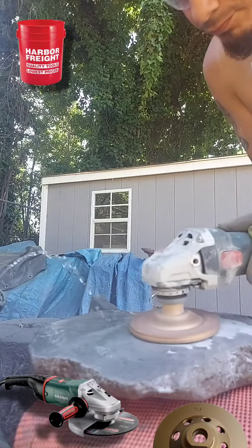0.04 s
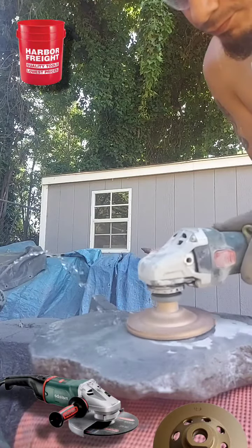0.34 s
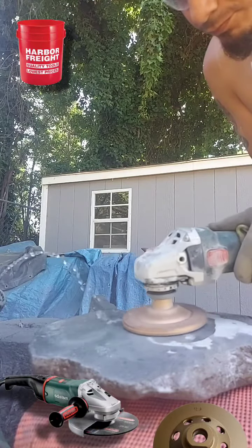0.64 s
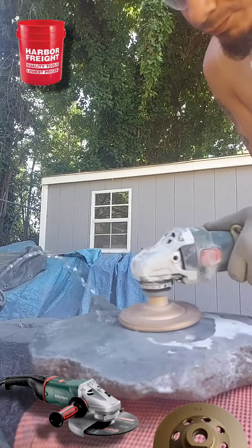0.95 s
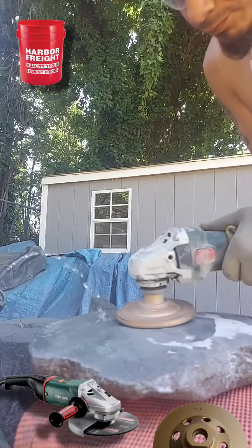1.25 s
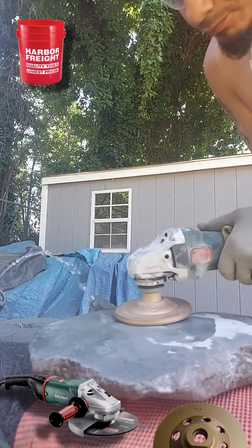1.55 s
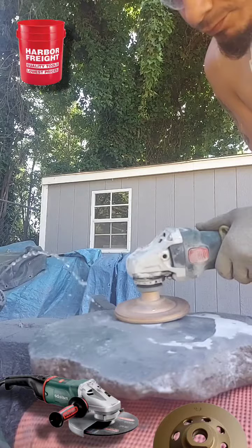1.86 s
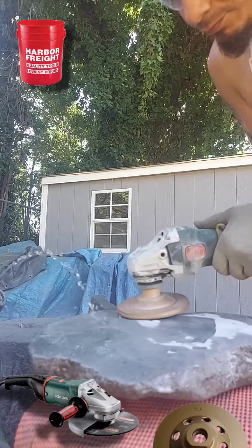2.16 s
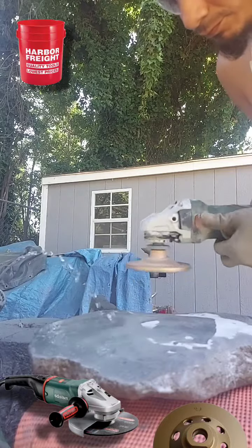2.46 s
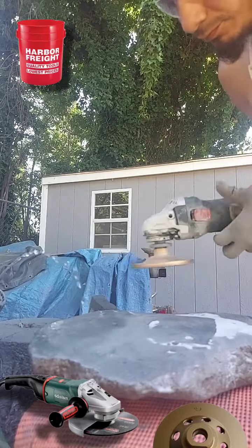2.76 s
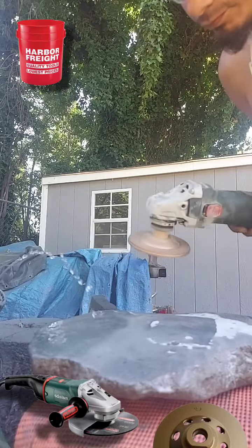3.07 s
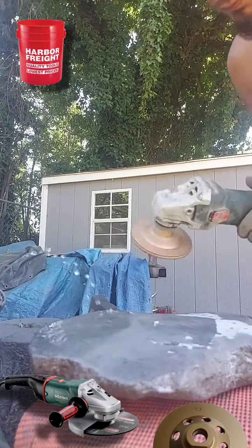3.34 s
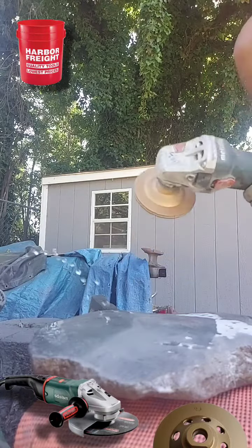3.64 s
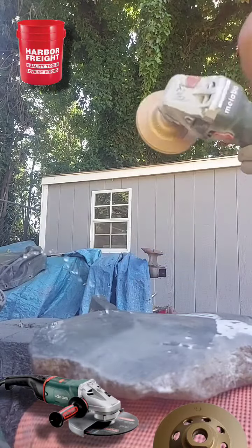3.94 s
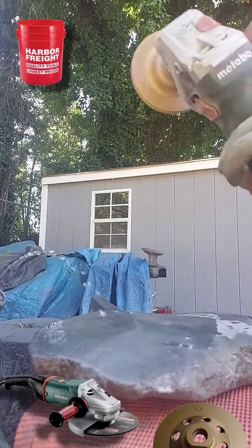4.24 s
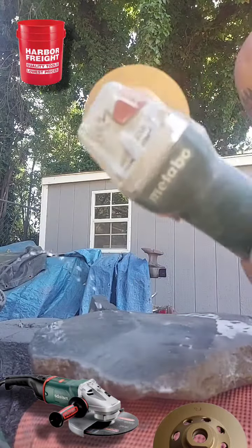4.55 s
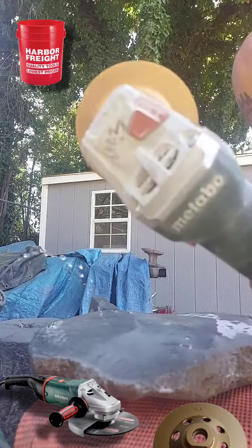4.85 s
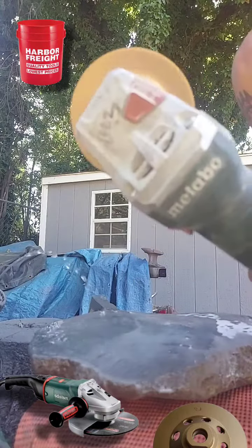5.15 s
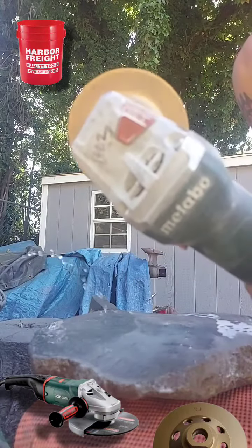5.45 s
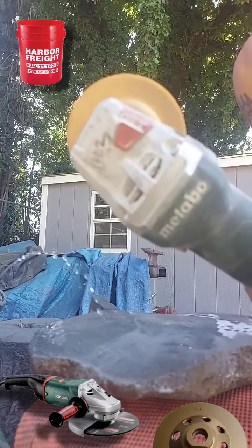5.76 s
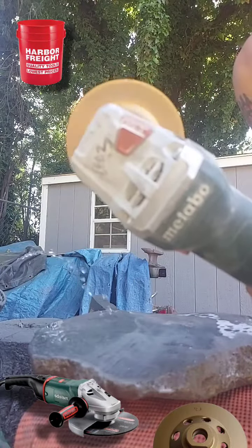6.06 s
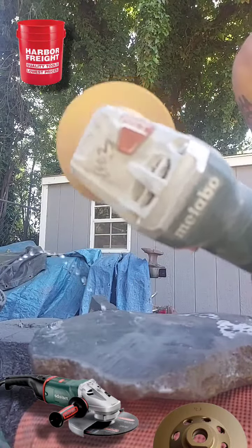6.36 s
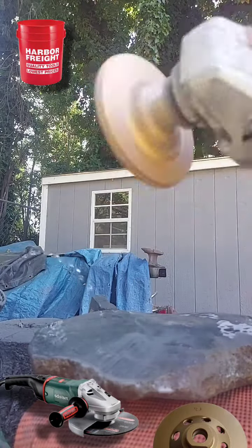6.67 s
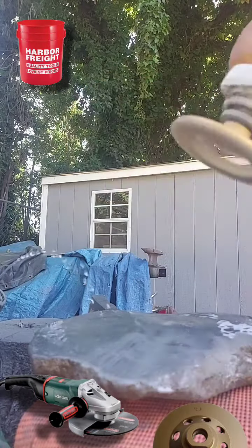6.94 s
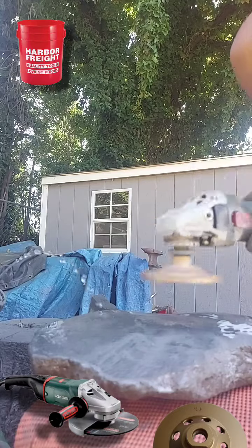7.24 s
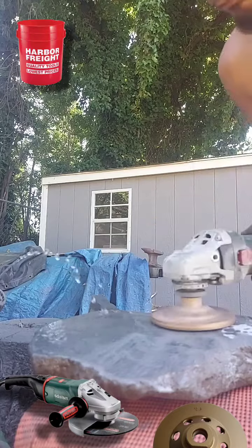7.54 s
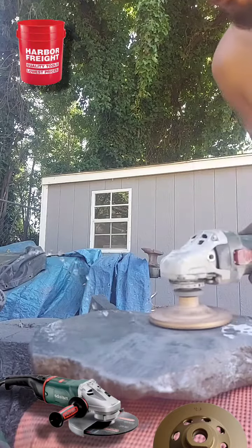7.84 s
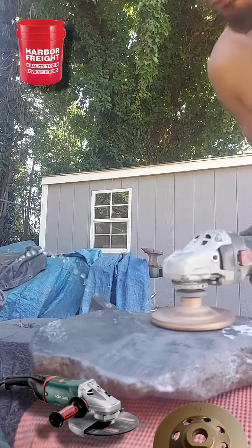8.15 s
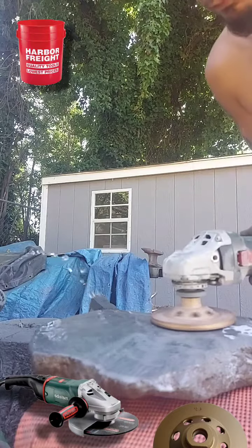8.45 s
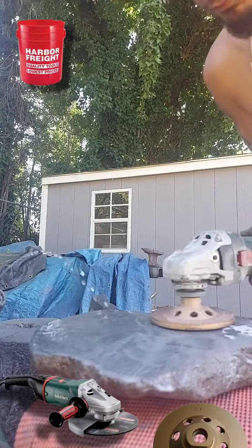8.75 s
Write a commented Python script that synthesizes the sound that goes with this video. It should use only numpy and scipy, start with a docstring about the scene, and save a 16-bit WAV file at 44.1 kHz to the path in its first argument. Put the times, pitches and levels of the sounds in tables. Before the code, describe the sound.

A loud, muffled rasp and steady gear whine come from an angle grinder working wet stone near the microphone, over faint outdoor rumble. The wheel leaves the slab and the motor winds down in a bright airy hiss, with low puffs of air hitting the microphone. A squeaky bearing rattle comes closer, harder and lower in pitch. Finally the steel wheel bumps back onto the stone, scraping and ringing through water spray as it slows.

```python
"""A loud, dull rasp, close by: an angle grinder bites into a wet stone slab outdoors, gears singing.
It lifts off, the treble opens up and it coasts down: the fan hisses, the wheel's draught buffets
the microphone and a loose bearing chatters ever lower. Set back on the stone, the steel wheel
scrapes, throws spray, rings in pairs of tones that close up as it slows, and nearly stops."""
import sys
import numpy as np
from scipy import signal
from scipy.fft import rfft, irfft, next_fast_len
from scipy.io import wavfile
from scipy.ndimage import map_coordinates

SR = 44100
rng = np.random.default_rng(int(sys.argv[2]) if len(sys.argv) > 2 else 0)


def unload_audio(sound):
    """Save the sound as a 16-bit wav file, at the path given as the first command line argument."""
    columns = np.transpose(np.atleast_2d(sound))
    # keep every value between -1 and 1, then stretch to whole-number steps
    steps = np.round(np.clip(columns, -1, 1) * 32767)
    wavfile.write(sys.argv[1], SR, steps.astype(np.int16))


N = 392490
T = np.arange(N) / SR
LIFT_S, POWER_OFF_S, TOUCH_S = 2.296, 2.45, 7.541
FULL_SPEED_HZ, TOP_HZ = 549, 14560  # motor under power; upper edge of the sound

# Levels in the tables are relative, ahead of the mix gains.
# The tool's panning. Each row: time in seconds, left lag in samples, left level in dB.
PAN = [(0, -2, -7.5), (2.3, 2, -5), (3.8, -2.5, -4.5), (4.3, -7, -3.5), (6.2, -6, -1.5), (7.2, -6, -5.5),
       (7.6, 2, -5.5), (8.9, 7, -5.5)]
# Pressure on the stone. Each row: time in seconds, level of the lead gear tone in dB.
LOAD = [(0.0, -25), (0.25, -24), (0.41, -38), (1.1, -20), (1.31, -23.5), (1.38, -31), (1.5, -15.5),
        (1.57, -25), (1.85, -17), (1.93, -30.5), (1.99, -22), (2.28, -39)]
# Tone of grit on stone. Each row: frequency in Hz, level in dB.
RASP_EQ = [(88, -45.5), (150, -4.5), (298, -5.5), (353, -1), (468, -7.5), (621, -5), (693, -6), (755, 0),
           (833, -7), (1190, -5.5), (1280, -10.5), (1780, -3.5), (2800, -16.5), (3640, -34), (6160, -120)]
# Fader of the upper rasp. Each row: time in seconds, level in dB.
GRIT_FADER = [(0.0, -23.5), (1.0, -23.5), (1.38, -26.5), (1.57, -21.5), (2.26, -24), (2.28, -19.5)]
# The grit bites; the rim squeals. Each row: centre in seconds, half length in seconds, level in dB.
GRIT_SURGES = [(.15, 0.055, -3.5), (.62, 0.019, 1), (.8, 0.067, -2), (1.77, 0.056, -10)]
RIM_SQUEAL = [(.56, 0.14, -32.5)]
# The body's two low resonances. Each row: time in seconds, growl in dB, drone in dB.
BODY_FADERS = [(0, -39, -34), (.5, -37.5, -26), (.72, -32.5, -29.5), (1.05, -26, -31), (1.36, -35, -32),
               (1.48, -22.5, -34.5), (1.58, -38, -36), (1.86, -26.5, -30), (2.28, -29.5, -36.5)]
# Gears under load. Each row: pitch in Hz, level in dB, drift in dB per second, left level in dB.
GEAR_TONES = [(665, -40.5, -3, -4.5), (751, -25, 0, -7), (1135, -40, 4, -11), (1270, -41, -3, 0.5),
              (1325, -39, 1.5, -3.5), (1713, -33.5, -4.5, -14.5), (1723, -32, -1, -18.5),
              (1875, -31.5, -2.5, -11.5), (1943, -39, -5, -11), (2060, -39.5, -3, -15.5),
              (2373, -36, -1.5, -4), (2566, -41, -4, 2.5), (2740, -45, -2, 6.5)]
# Outdoor rumble; low buffeting under load. Each row: frequency in Hz, level in dB.
YARD_EQ = [(25, -46), (85, -2), (125, 6.5), (190, -11.5), (600, -18), (2500, -55)]
BUFFET_EQ = [(3, -44.5), (9, -1.5), (18, 3), (45, -4), (90, -10.5), (200, -17), (450, -26.5),
             (1000, -41.5)]
# The tool's path. Each row: time in seconds, distance in metres.
TOOL_DISTANCE = [(3.2, 0.49), (3.7, 0.44), (4.1, 0.31), (4.6, 0.2), (4.95, 0.13), (5.35, 0.12),
                 (6.55, 0.14), (6.9, 0.17), (7.25, 0.25), (8.9, 0.36)]
# Fan layers by name. Each row: level in dB at full speed on the slab, speed and nearness exponents.
FAN_LAYERS = {"rush": (-34, 1, 0.96), "hiss": (-33.5, 0.89, 1.2), "whistle": (-26, 1.65, 0.25),
              "fizz": (-22, 1.24, 0.27), "slots": (-48.5, 3, 1.1)}
# Four bands of fan air, then the whine's colour. Each row: frequency in Hz, level in dB.
RUSH_EQ = [(180, -31), (270, -3), (360, -13.5), (480, -1), (750, -1.5), (1100, 3.5), (1600, 2), (2400, 5),
           (3500, -2.5), (6000, -25.5)]
HISS_EQ = [(1500, -37), (2400, -3), (3000, 7), (3700, -0.5), (4800, 4.5), (6200, -6.5), (7500, -16),
           (9500, -39)]
WHISTLE_EQ = [(100, -18), (450, -12.5), (4500, -3), (6200, 1.5), (7200, 0), (8200, 4.5), (8800, 0.5),
              (9500, -16), (11000, -44)]
FIZZ_EQ = [(8500, -43), (9800, -6.5), (10800, -0.5), (12500, 4.5), (14000, 9.5), (14600, 5)]
WHINE_EQ = [(6500, -2), (8300, 15), (9600, -15), (11200, 19), (14000, 8)]
# The whine's partials, in multiples of the motor speed.
WHINE_HARMONICS = [25, 49, 54]
# Fader of the rotor's hum. Each row: time in seconds, level in dB.
HUM_FADER = [(3.5, -51), (4.35, -46), (5.2, -49), (6.1, -51.5), (7.1, -58)]
# The bearing's running chatter. Each row: time in seconds, pitch in Hz, level in dB.
CHATTER_GLIDE = [(2.3, 5000, -27.5), (3.0, 4985, -32), (3.4, 5070, -26.5), (3.75, 4300, -29),
                 (3.87, 4406, -34), (4.15, 4520, -28.5), (4.42, 4236, -31), (4.56, 4108, -36),
                 (4.9, 3900, -27), (5.3, 3500, -24.5), (5.65, 3266, -27), (6.1, 3142, -24),
                 (6.6, 2900, -26), (7.1, 2850, -36.5), (7.5, 2434, -32)]
# Resonances of the bearing cage and the gear head. Each row: pitch in Hz, width in Hz, level in dB.
CAGE_MODES = [(3080, 540, -31), (3780, 420, -29), (4270, 91, -32), (4760, 460, -38)]
HEAD_MODES = [(1840, 160, -17), (4230, 50, -20), (10400, 80, -22)]
# The bearing's hard catches. Each row: start in seconds, level in dB, pitch in Hz.
CATCH_CUES = [(4.5607, -7, 4200), (4.5815, -7.2, 4200), (4.606, -11, 4280), (4.6204, -12.8, 4190),
              (4.649, -12.1, 4080), (4.6619, -11.6, 3980), (4.7172, -12.5, 3840), (5.2116, -10.5, 3490),
              (5.253, -9.5, 3520), (5.5738, -11.5, 3360), (5.6641, -12.5, 3410), (6.1744, -11.5, 3090),
              (6.4341, -12.4, 2950), (6.4639, -14.7, 2680), (6.4915, -14.7, 2710), (6.5168, -12.0, 2680),
              (6.5446, -12.5, 2680), (6.5677, -13.7, 2490), (6.5883, -13.0, 2760), (6.6163, -11.3, 2720),
              (6.6371, -12.6, 2950), (6.6568, -11.1, 2830), (6.6838, -10.1, 2780), (6.7103, -12.6, 2980),
              (6.7309, -12.6, 2440), (6.7589, -12.3, 2890), (6.7862, -9.3, 2530), (6.7966, -14.9, 2580),
              (6.8046, -15.5, 2560), (6.8205, -14.9, 2570), (6.8472, -14.6, 2650), (6.8622, -12.3, 2730),
              (6.8874, -11.2, 2600), (6.9088, -13.6, 2620), (6.9155, -12.8, 2610), (6.9201, -13.2, 2410),
              (6.9469, -11.2, 2600), (6.976, -13.6, 2510), (6.9931, -14.2, 2590), (7.0184, -19.0, 2560),
              (7.0398, -18.7, 2540), (7.0575, -15.4, 2490), (7.0833, -13.8, 2540), (7.1044, -13.0, 2510),
              (7.1152, -15.1, 2510), (7.123, -13.0, 2530), (7.1519, -14.7, 2460), (7.1809, -14.6, 2540),
              (7.2122, -16.8, 2520), (7.2267, -16.8, 2460), (7.2527, -16.5, 3120), (7.2754, -16.6, 2530),
              (7.3079, -14.5, 2510), (7.3293, -18.5, 2500), (7.3544, -16.1, 2500), (7.3763, -14.2, 2520),
              (7.3952, -17.1, 2490), (7.4124, -19.2, 2490), (7.427, -16.5, 3250), (7.454, -13.8, 2410),
              (7.473, -15.4, 2350), (7.494, -16.1, 2480), (7.514, -15.9, 2460), (7.526, -14.5, 2400)]
# Colour of the housing and of a catch's hard edge. Each row: frequency in Hz, level in dB.
HOUSING_EQ = [(100, -51), (450, -1.5), (1500, -10.5), (2500, -3), (3650, -3), (5300, 0.5), (7900, -9),
              (9600, -32), (11000, -2.5), (13500, 3.5), (14500, -12)]
TICK_EQ = [(100, -54), (1500, -21), (4000, -16.5), (6200, 10.5), (9600, -42), (11200, -6), (13500, 3.5)]
# The wheel rings off the stone. Each row: pitch in Hz, level in dB, seconds to fall by 60 dB.
LIFT_RING = [(2274, -34, 0.23), (2750, -24.5, 0.5), (6000, -24, 0.3)]
# The wheel bumps the stone. Each row: start in seconds, level in dB.
BUMP_CUES = [(2.38, -20), (7.541, -13), (7.964, -17.5)]
# Tone of the graze and bumps. Each row: frequency in Hz, level in dB.
CONTACT_EQ = [(100, -6), (1200, -3.5), (5000, -7), (14000, -16)]
# The wheel's bending modes. Each row: pitch at rest in Hz, nodal diameters, width in Hz,
# forward wave in dB, backward wave in dB, change in dB by the end of braking.
WHEEL_MODES = [(5716, 3, 45, -1, -6, 0), (9740, 4, 23, -8, -13.5, -3), (14530, 5, 25, -6.5, -2, -4.5)]
# Fader of the rubbed steel's ring. Each row: time in seconds, level in dB.
RUB_FADER = [(7.57, -22.5), (7.68, -18), (7.95, -23), (8.07, -20), (8.6, -20.5), (8.9, -28)]
# Passes of the draught. Each row: centre in seconds, half length in seconds, typical eddy in dB.
DRAUGHT_SWEEPS = [(2.34, 0.086, -22.5), (2.7, 0.33, -30), (3.72, 0.17, -26.5), (6.85, 0.11, -41),
                  (8.0, 0.5, -36.5)]
# Its strongest puffs. Each row: time in seconds, peak in dB.
PUFF_CUES = [(2.333, -15), (2.412, -18.5), (2.566, -19.5), (2.586, -17), (2.659, -18.5), (2.741, -19),
             (2.763, -17.5), (2.872, -19.5), (3.018, -19), (3.073, -19), (3.259, -25.5), (3.339, -22.5),
             (3.52, -20), (3.61, -22), (3.677, -16.5), (3.746, -18), (7.565, -18), (7.579, -18),
             (7.853, -14), (7.885, -18.5), (7.971, -14.5), (8.063, -25.5), (8.223, -19), (8.237, -19),
             (8.311, -22)]
# The rim's groan. Each row: time in seconds, pitch in Hz, level in dB.
GROAN_GLIDE = [(7.55, 2460, -34), (7.7, 2550, -34), (8.05, 2620, -36), (8.42, 2782, -31),
               (8.9, 2734, -30.5)]
# Sliding on stone, and the water thrown. Each row: frequency in Hz, level in dB.
SCRAPE_EQ = [(100, -37.5), (300, -5), (700, -3.5), (1100, 4.5), (1550, -2.5), (2700, 2), (3600, -2.5),
             (4800, 3.5), (7000, 5), (10000, -32)]
SPRAY_EQ = [(400, -54), (4500, -13), (6300, 0), (8300, 0), (9300, -0.5), (11300, -7), (12600, -1.5),
            (14000, 3.5), (14600, 1.5)]
# Colour of the shaded left side and of the dull opening. Each row: frequency in Hz, gain in dB.
LEFT_EQ = [(30, -6.5), (500, 3.5), (1100, 0), (4500, -2), (8000, -3.5), (9700, 3), (11000, 0.5),
           (14000, -6.5)]
MUFFLE_EQ = [(2720, 1.5), (2800, -4), (2950, -8), (3080, -28.5), (3500, -100)]


def amp(db):
    """Decibels to gain."""
    return 10 ** (np.asarray(db) / 20)


def unit(x):
    """Scale to rms 1."""
    return x / np.sqrt(np.mean(x ** 2) + 1e-20)


def curves(rows):
    """One automation curve for each column after the time."""
    s, *columns = np.transpose(rows)
    return [np.interp(T, s, column) for column in columns]


def wobble(rate):
    """A smooth random curve, rate knots a second."""
    knots = rng.standard_normal(int(N * rate / SR) + 4)
    return np.interp(T, T[::10], map_coordinates(knots, [T[::10] * rate]))


def filtered(x, response):
    """Filter x by a gain given as a function of frequency."""
    size = next_fast_len(N + 8192)
    return irfft(rfft(x, size) * response(np.fft.rfftfreq(size, 1 / SR)), size)[..., :N]


def equalised(x, eq):
    """x through an EQ of (Hz, dB) points on a log axis."""
    points_hz, db = np.transpose(eq)
    return filtered(x, lambda hz: amp(np.interp(np.log(hz + 1), np.log(points_hz), db)))


def noise(eq):
    """Noise of rms 1 shaped by an EQ."""
    return unit(equalised(rng.standard_normal(N), eq))


def phase_of(hz):
    """Running phase of a gliding pitch."""
    return 2 * np.pi * np.cumsum(hz + np.zeros(N)) / SR


def rubbed(hz, width):
    """A resonance of rms 1 kept ringing by random friction; its centre may move."""
    kicks = rng.standard_normal((2, N))
    pole, skirt = np.exp(-np.pi * width / SR), np.exp(-np.pi * width * 8 / SR)
    swell = signal.lfilter([1], np.poly([pole, skirt]), kicks)
    phase = phase_of(hz)
    return unit(swell[0] * np.cos(phase) + swell[1] * np.sin(phase))


def fade_in(start_s, rise_s):
    """A straight ramp from 0 to 1."""
    return np.clip((T - start_s) / rise_s, 0, 1)


def swells(rows):
    """Bell-shaped gains. Each row: centre in seconds, half length in seconds, level in dB."""
    return sum(amp(db) * np.exp(-((T - s) / half) ** 2) for s, half, db in rows)


def bursts(times, sizes, rise_s):
    """Envelope of short hits, each peaking at its size one rise time after it starts."""
    age = np.arange(SR // 30) / SR / rise_s
    starts = np.bincount(np.clip(times * SR, 0, N - 1).astype(int), sizes, N)
    return signal.fftconvolve(starts, age * np.exp(1 - age))[:N]


def panned(x, left_db, scatter, turn=0, swirl=np.pi):
    """The right side faces the tool; the left is shaded, shifted and scattered in phase."""
    lag, shade_db = curves(PAN)
    analytic = signal.hilbert(x, next_fast_len(N))[:N]
    diffuse = np.real(analytic * np.exp(1j * (turn + swirl * wobble(100))))
    direct = map_coordinates(x, [np.arange(N) - lag], order=2)
    left = np.sqrt(1 - scatter) * direct + np.sqrt(scatter) * diffuse
    return np.array([amp(shade_db + left_db) * left, x])


def grinding(growl_hz=346, drone_hz=619, squeal_hz=2752):
    """Grit rasps on stone over a growling body, gear tones, a brief squeal and low buffeting."""
    load_db, = curves(LOAD)
    grit_db, = curves(GRIT_FADER)
    lean_db = load_db - load_db.mean()
    scrape = noise(RASP_EQ) * amp(1.3 * wobble(190))
    low = unit(filtered(scrape, lambda hz: 1 / (1 + (hz / 1130) ** 40)))
    high = unit(filtered(scrape, lambda hz: 1 - 1 / (1 + (hz / 1370) ** 16)))
    rasp = amp(-25 + 0.047 * lean_db) * low + amp(grit_db - 2.5) * high
    rasp += amp(grit_db - 6.5) * swells(GRIT_SURGES) * high
    mesh = phase_of(1 + 0.00242 * wobble(6.1))  # growl and gear tones waver slightly in pitch together
    growl_db, drone_db = curves(BODY_FADERS)
    growl = amp(growl_db) * np.sin(growl_hz * mesh + .6 * wobble(35))
    drone = amp(drone_db) * rubbed(drone_hz, 32)
    squeal = swells(RIM_SQUEAL) * rubbed(squeal_hz, 12)
    buffet = amp(-26 + 0.32 * lean_db + 2.9 * wobble(7.91) + 3.6 * wobble(60)) * noise(BUFFET_EQ)
    pair = panned(rasp, left_db=-6.5, scatter=1)
    pair += panned(growl + drone + squeal, left_db=-7, scatter=0.24)
    pair += gears(mesh, load_db) + buffet * amp([[-26], [0]])
    return pair * (1 - fade_in(LIFT_S, 0.0045))


def gears(mesh, load_db, left_lead_s=.00014):
    """Meshing gears sing: the lead tone swells with the pressure, the weaker ones come and go."""
    strongest = max(row[1] for row in GEAR_TONES)
    pair = 0
    for hz, db, drift, left_db in GEAR_TONES:
        if db == strongest:
            level = load_db - .9 + 1.9 * wobble(27)
        else:
            level = db + drift * (T.clip(0, LIFT_S) - LIFT_S / 2) + 2.6 * wobble(4.52)
        phase = hz * mesh + 0.31 * wobble(45)
        left = amp(left_db) * np.sin(phase + 2 * np.pi * hz * left_lead_s)
        pair += amp(level) * np.array([left, np.sin(phase)])
    return pair


def yard():
    """A faint, uneven bed of outdoor rumble."""
    return amp(-49.5 + 3 * wobble(12)) * np.array([noise(YARD_EQ), noise(YARD_EQ)])


def motor_speed(drag_s=7.5, friction_hz_per_s=20, brake_hz_per_s=128):
    """Turns per second: steady under power, slowed by air drag and bearings, then by the stone."""
    coasting_s = np.clip(T - POWER_OFF_S, 0, TOUCH_S - POWER_OFF_S)
    friction_hz = friction_hz_per_s * drag_s
    free_hz = (FULL_SPEED_HZ + friction_hz) * np.exp(-coasting_s / drag_s) - friction_hz
    return free_hz - brake_hz_per_s * np.maximum(T - TOUCH_S, 0)


def fan_gain(layer, slab_m=.45):
    """Gain of one fan layer: louder when faster and when nearer."""
    db, speed_power, near_power = FAN_LAYERS[layer]
    metres, = curves(TOOL_DISTANCE)
    return amp(db) * (motor_speed() / FULL_SPEED_HZ) ** speed_power * (slab_m / metres) ** near_power


def fan():
    """Air rushes through the vents, with the falling hum and thin whine of the rotor."""
    jet = amp(7 * swells([(3.78, 0.26, 0)]))  # the vents swing past and whistle louder
    air = fan_gain("rush") * noise(RUSH_EQ) + fan_gain("hiss") * noise(HISS_EQ)
    air += jet * fan_gain("whistle") * noise(WHISTLE_EQ)
    air += jet ** 0.44 * fan_gain("fizz") * noise(FIZZ_EQ)
    hum_db, = curves(HUM_FADER)
    speed = motor_speed()
    whine = fan_gain("slots") * amp(2.5 * wobble(7))
    whine *= sum(rubbed(np.minimum(k * speed, SR / 2), width=100) for k in WHINE_HARMONICS)
    blur = 1.5 * (1 - speed / FULL_SPEED_HZ) * wobble(40)  # the hum's phase strays as it slows
    rotor = amp(hum_db) * np.sin(phase_of(speed) + blur) + equalised(whine, WHINE_EQ)
    return panned(air + rotor, left_db=-5.5, scatter=0.34) * fade_in(LIFT_S, 0.0046)


def squeak(pitch, bite):
    """Rough stick-slip tone of rms 1; a harder bite adds overtones and grit."""
    phase = phase_of(pitch * (1 + .035 * wobble(800)))
    overtones = sum(size * np.sin(k * phase) * (k * pitch < TOP_HZ)
                    for k, size in enumerate([0.8, 0.87, 0.27, 0.5], 2))
    grit = 0.35 * (1 + bite) * rng.standard_normal(N)
    return unit(np.sin(phase) + bite * overtones + grit)


def bearing():
    """The loose cage catches for milliseconds at a time and squeaks, lower as the shaft slows."""
    pitch, chatter_db = curves(CHATTER_GLIDE)
    bite = np.clip((4700 - pitch) / 2000, .05, 1)  # slow catches bite harder
    cage_turns = np.cumsum(motor_speed() * .24) / SR
    light_s = T[1:][np.diff(np.floor(cage_turns)) > 0]  # one light catch a turn
    late, accent = rng.standard_normal((len(light_s), 2)).T
    pulses = unit(bursts(light_s + 0.0011 * late, amp(2.5 * accent), rise_s=0.002))
    hop = .024 * (1 - .75 * bite) * wobble(90)  # fast catches scatter more in pitch
    jitter = .06 * (1 - bite) * wobble(1500)
    chatter = amp(chatter_db) * squeak(pitch * (1 + hop + jitter), bite=0.58)
    cage_swell = swells([(4.77, 0.69, 0)])  # the cage's ringing swells around 4.8 s, then fades
    cage = cage_swell * sum(amp(db) * rubbed(hz, width) for hz, width, db in CAGE_MODES)
    s, db, hz = hard_catches()
    latest = np.maximum(np.searchsorted(s, T) - 1, 0)
    hard = bursts(s, amp(db - 2), rise_s=0.0009) * squeak(hz[latest], bite)
    ticks = bite ** 2 * bursts(s + 0.00043, amp(db + 2), rise_s=0.00018) * noise(TICK_EQ)
    sound = equalised(pulses * (chatter + cage) + hard, HOUSING_EQ) + ticks
    lifted = fade_in(LIFT_S, .003) * (1 - fade_in(TOUCH_S, .01))
    return panned(sound * lifted, left_db=-0.5, scatter=1, turn=1, swirl=.3)


def hard_catches(start_s=4.3, end_s=6.42, gap_s=.021, fade_db_per_s=1):
    """Times, levels and pitches of the bearing's even rattle, merged with its cued catches."""
    spacing, accent, detune = rng.standard_normal((100, 3)).T
    s = start_s + np.cumsum(gap_s * np.exp(.07 * spacing))
    db = -14 - fade_db_per_s * (s - start_s) + accent
    hz = np.interp(s, T, curves(CHATTER_GLIDE)[0]) * (1 + .025 * detune)
    rows = np.vstack([np.transpose([s, db, hz])[s < end_s], CATCH_CUES])
    return rows[np.argsort(rows[:, 0])].T


def wheel():
    """The steel rings at lift-off, bumps, then rubs; spin splits each rubbed mode into two waves."""
    spin = motor_speed() / 3.5  # geared down by the bevel gear
    rub_db, = curves(RUB_FADER)
    braked = fade_in(TOUCH_S, 1.36)
    waves = 0
    for hz, diameters, width, forward_db, backward_db, late_db in WHEEL_MODES:
        split = diameters * spin
        forward = amp(forward_db) * rubbed(hz + 0.5 * split, width)
        backward = amp(backward_db) * rubbed(hz - 1.5 * split, width)
        waves += amp(late_db * braked) * (forward + backward)
    head = filtered(rng.standard_normal(N), lambda f: sum(
        amp(db) * np.sqrt(SR / (2 * width) / (1 + (2 * (f - hz) / width) ** 4))
        for hz, width, db in HEAD_MODES))
    rub = amp(rub_db - 3.5 + 1.6 * wobble(70)) * (waves + head) * fade_in(TOUCH_S, 0.0043)
    free_s = np.maximum(T - 2.4, 0)  # time since the rim cleared the stone
    ring = sum(amp(db - 60 * free_s / t60) * np.sin(phase_of(hz) + 0.15 * wobble(29))
               for hz, db, t60 in LIFT_RING)
    bump_s, bump_db = np.transpose(BUMP_CUES)
    graze = amp(-27.5 - 60 * free_s / 0.086 + 2 * wobble(150)) * fade_in(LIFT_S, .003)
    contact = (graze + bursts(bump_s, amp(bump_db - 4.5), rise_s=0.0022)) * noise(CONTACT_EQ)
    return panned(rub + ring * fade_in(LIFT_S, 0.017) + contact, left_db=-2.5, scatter=0.75)


def draught(count=900, eddy_s=0.0007, flutter_s=0.0086):
    """Air flung off the wheel thumps the microphone's right side, each eddy one push and pull."""
    accent, sign, length = rng.standard_normal((count, 3)).T
    loose_s = rng.uniform(LIFT_S, T[-1], count)
    loose_peak = np.interp(loose_s, T, swells(DRAUGHT_SWEEPS)) * amp(5 * accent) * np.sign(sign)
    eddies = list(zip(loose_s, loose_peak, length))
    for s, db in PUFF_CUES:
        for k in range(3):  # a puff and two fading eddies behind it
            late, sign, length = rng.standard_normal(3)
            peak = amp(db - 4.5 * k) * np.sign(sign)
            eddies.append((s + k * flutter_s * np.exp(late / 4), peak, length))
    s, peak, length = np.transpose(eddies)[:, :, None]
    samples = (s * SR).astype(int) + np.arange(-SR // 80, SR // 80)
    passage = (samples / SR - s) / (eddy_s * np.exp(0.48 * length))
    thumps = peak * passage * np.exp(1 - abs(passage))
    push = np.bincount(samples.ravel(), thumps.ravel(), N)[:N]
    return np.array([amp(-37) * push, push])


def groan(width_hz=130, swing_hz=90, judder_db=3):
    """The rim judders on the stone about once a turn: a rough tone wavering in pitch and level."""
    hz, db = curves(GROAN_GLIDE)
    lap = phase_of(motor_speed() / 3.2) + wobble(12)
    tone = amp(db + judder_db * np.cos(lap)) * rubbed(hz + swing_hz * np.sin(lap), width_hz)
    return panned(tone * fade_in(TOUCH_S, 0.0089), left_db=-1.5, scatter=0.65)


def sliding():
    """Set down again, the wheel scrapes the wet stone and throws spray, both fading as it slows."""
    speed = motor_speed()
    pace = speed / np.interp(TOUCH_S, T, speed)
    scrape = amp(-29) * pace ** 0.28 * noise(SCRAPE_EQ)
    spray = amp(-23) * pace ** 0.59 * noise(SPRAY_EQ)
    return panned((scrape + spray) * fade_in(TOUCH_S, 0.045), left_db=-2, scatter=0.93)


def scene():
    """The stereo mix: the grinder up front, the yard underneath."""
    tool = grinding() + fan() + bearing() + wheel() + groan() + sliding() + draught()
    left, right = amp(5) * tool + yard()
    return np.array([equalised(left, LEFT_EQ), right])


def record(dry):
    """Peaks are clipped; the mix is muffled until the lift, then opens up to TOP_HZ."""
    clipped = np.clip(dry, -.8, .8)
    opened = fade_in(LIFT_S, .002)
    sound = equalised(clipped, MUFFLE_EQ) * (1 - opened) + clipped * opened
    return filtered(sound, lambda hz: np.clip((TOP_HZ - hz) / 100 + .5, 0, 1))


dry = scene()
out = record(dry)
unload_audio(out)
```